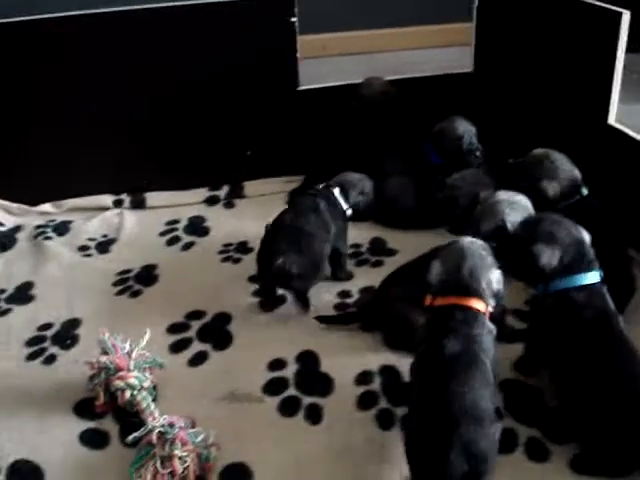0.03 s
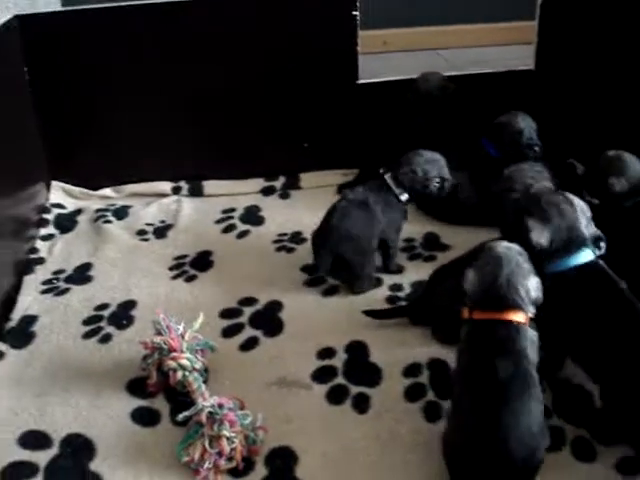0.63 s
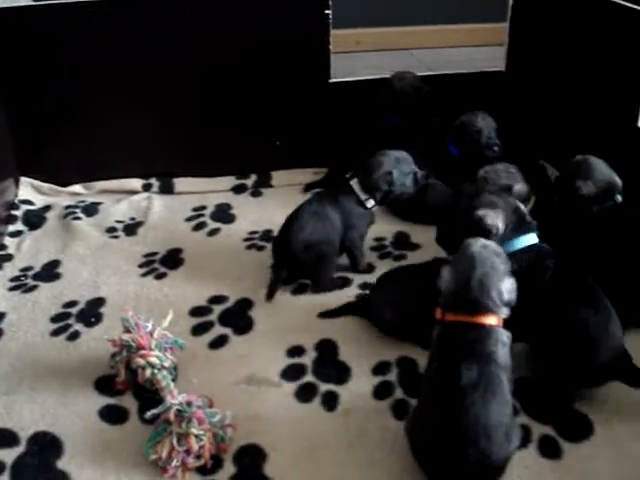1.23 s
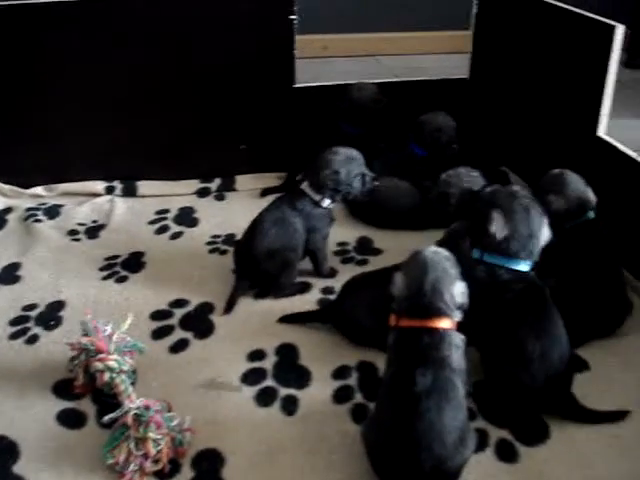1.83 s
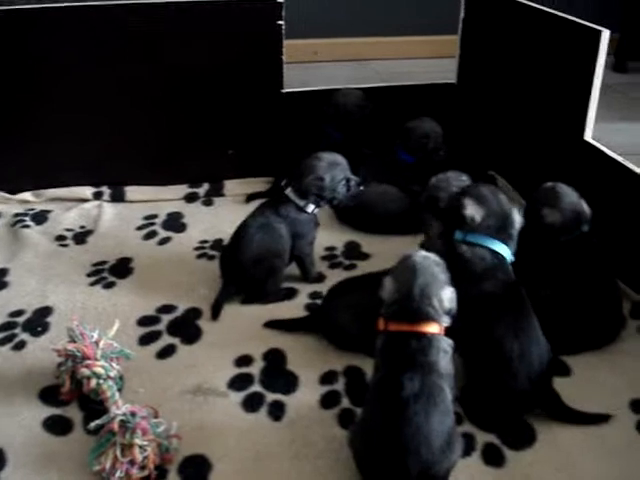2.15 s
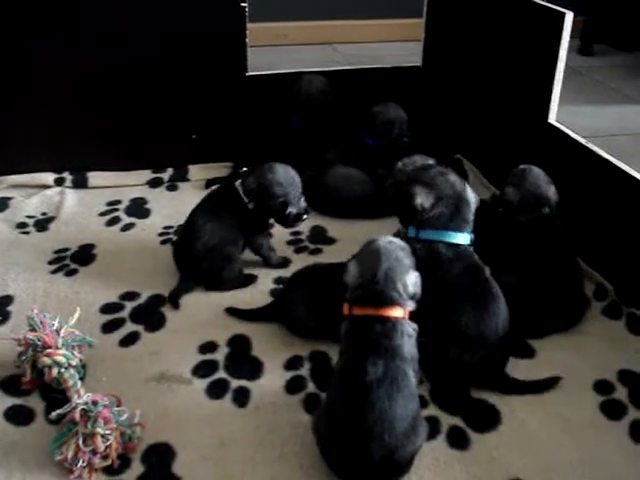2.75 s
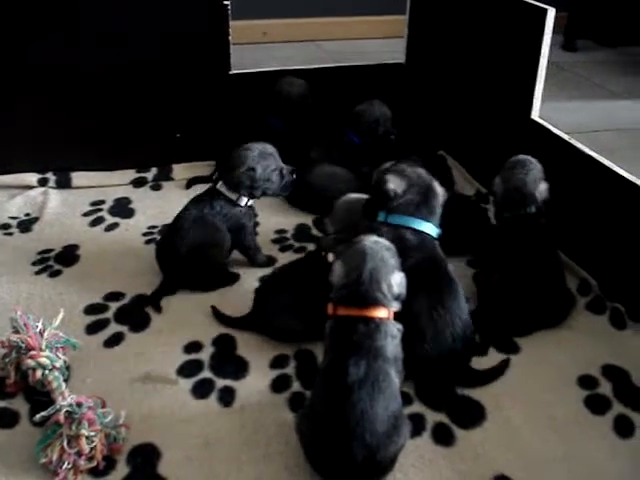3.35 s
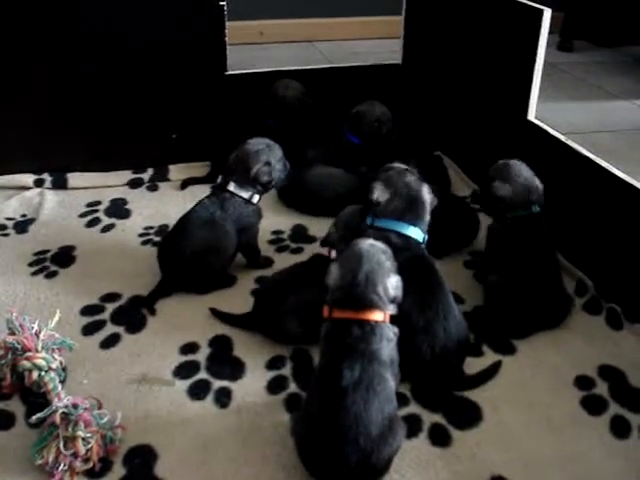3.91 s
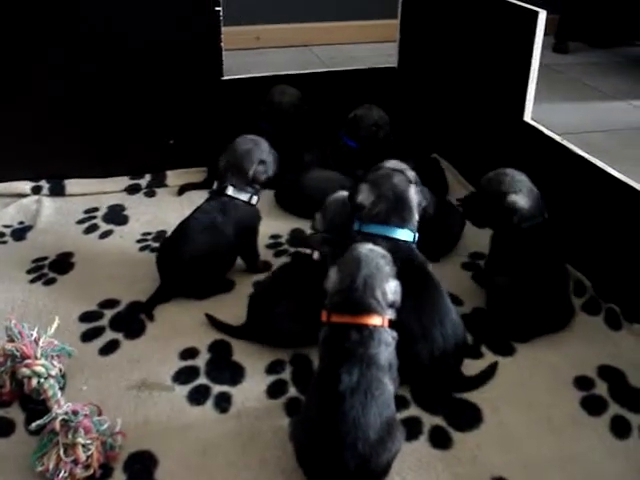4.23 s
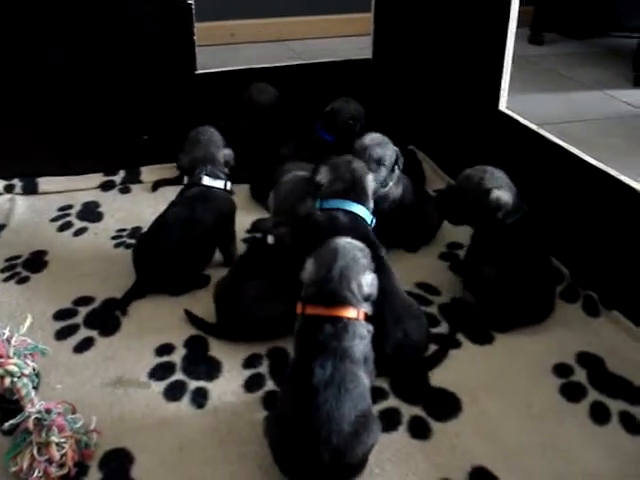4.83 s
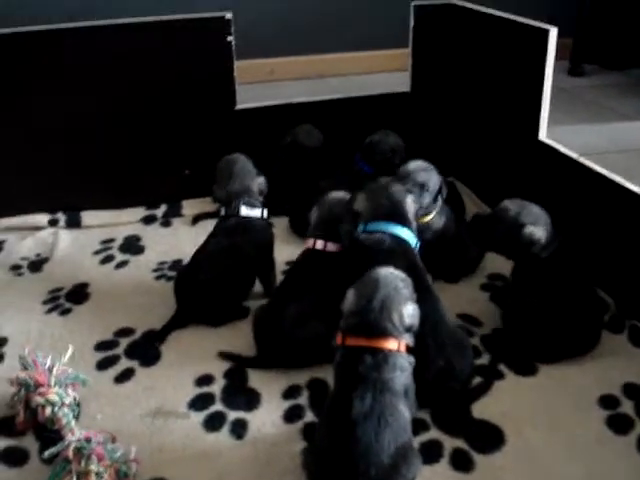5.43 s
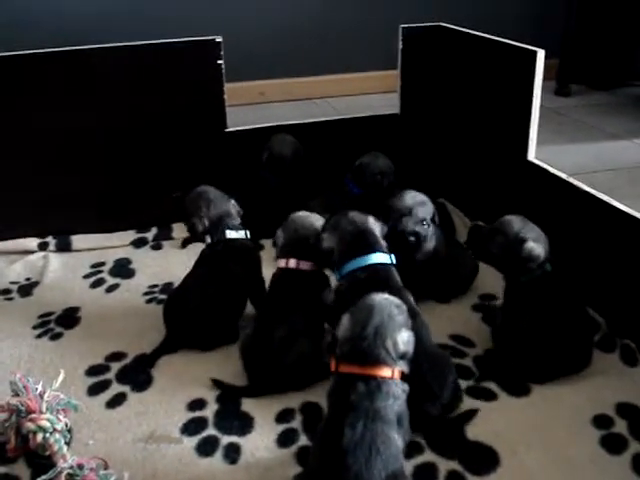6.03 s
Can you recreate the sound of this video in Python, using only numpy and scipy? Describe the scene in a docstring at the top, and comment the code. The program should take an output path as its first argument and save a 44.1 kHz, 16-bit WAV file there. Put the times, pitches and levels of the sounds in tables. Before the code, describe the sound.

Young puppies whine in a quiet room, a step or two from the microphone. The first and highest cry is already under way at the start, a sharp yelp sinking into a wavering nasal whine until about 0.7 seconds, with soft paw bumps near its end. Four more cries start at about 0.9, 1.8, 2.7 and 3.5 seconds. Each lasts roughly half a second, leaping up in a slightly cracking yelp, then dropping into a whine that slides up and down. The second and fifth whines are lower.

After 4.1 seconds it gets much quieter. A tiny low whimper follows the last cry, a higher one rises and falls at about 4.8 seconds with a faint sniff, and a last short one comes near 5.9 seconds. Fur brushes a blanket and paws bump very softly between them. A light hiss, faint handling rumble and brief room echo lie underneath.

```python
"""A quiet tiled room: puppies whine in a wooden pen, a step or two from the microphone.
Five cries start as an open-mouthed yelp and sink into a long whine through the nose; faint whimpers
follow. Each is a gliding stack of vocal-fold harmonics plus breath, shaped by throat, mouth and nose.
Paws bump, fur brushes on a blanket, a puppy sniffs faintly, and the room rings briefly. The hand on
the microphone rumbles; the recorder adds hiss and a thin high tone."""
import sys
import numpy as np
from scipy import signal
from scipy.fft import rfft, irfft, next_fast_len
from scipy.io import wavfile
from scipy.ndimage import uniform_filter1d

SR = 44100
rng = np.random.default_rng(int(sys.argv[2]) if len(sys.argv) > 2 else 0)


def store_wav(level_fs):
    """Save 16-bit WAV to argv[1]."""
    pcm = np.round(np.clip(np.atleast_2d(level_fs), -1, 1) * 32767)
    wavfile.write(sys.argv[1], SR, pcm.T.astype(np.int16))


N = 267898
BAND_LIMIT_HZ = 10050


def gain_of(db):
    """Decibels to amplitude."""
    return 10 ** (np.asarray(db) / 20)


def read(points, hz):
    """Interpolates a table on a log-frequency axis."""
    f, value = np.transpose(points)
    return np.interp(np.log(hz + 1), np.log(f + 1), value)


def ramp(t, start, length):
    """Linear rise from 0 to 1."""
    return np.clip((t - start) / length, 0, 1)


def bell(x, centre, width):
    """Gaussian of height 1."""
    return np.exp(-((x - centre) / width) ** 2)


def add(mix, start_s, sound):
    """Mixes a sound in; start_s may be negative."""
    start = round(start_s * SR)
    sound = sound[max(-start, 0):]
    part = mix[max(start, 0):][:len(sound)]
    part += sound[:len(part)]


def shaped_noise(gain_at, size):
    """Noise of rms 1, weighted by gain_at(hz)."""
    padded = 2 * next_fast_len(size // 2 + 1)
    hz = np.fft.rfftfreq(padded, 1 / SR)
    noise = irfft(rfft(rng.standard_normal(padded)) * gain_at(hz))[:size]
    return noise / np.sqrt(np.mean(noise ** 2) + 1e-20)


def coloured(spectrum, size):
    """Noise of rms 1 from (Hz, dB) points."""
    return shaped_noise(lambda hz: gain_of(read(spectrum, hz)), size)


def wander(rate_hz, size):
    """Smooth random motion of rms 1, up to about rate_hz."""
    return shaped_noise(lambda hz: 1 / (1 + (hz / rate_hz) ** 4), size)


# Each row: frequency in Hz, relative noise density in dB.
HISS_SPECTRUM = [(15, -64), (25, -25.5), (109, -9.5), (226, -1.5), (363, 0), (412, -1.5), (491, -1),
                 (599, -0.5), (679, -3), (732, -1), (1120, -4), (1850, -5.5), (9870, -13.5), (12800, -54),
                 (21700, -120)]


def background(hiss_db=-60.5, swell_db=0.93, tone_hz=8122.5, tone_db=-77.5):
    """Room noise and recorder hiss, with a thin electronic tone."""
    hiss = coloured(HISS_SPECTRUM, N) * gain_of(hiss_db + swell_db * wander(8.5, N))
    tone = np.sqrt(2) * np.sin(2 * np.pi * tone_hz * np.arange(N) / SR)
    return hiss + gain_of(tone_db) * tone


# Each row: time in seconds, rumble level in dB.
HANDLING_LEVELS = [(0, -70.5), (.9, -74), (1.402, -78), (1.998, -78), (3.7, -71), (4.4, -80), (6.07, -103)]


def handling(lumps_db=3):
    """Uneven low rumble from the hand holding the microphone."""
    level_db = np.interp(np.arange(N) / SR, *np.transpose(HANDLING_LEVELS))
    rumble = coloured([(15, -19), (35, -13), (100, -8.5), (190, -5), (450, -29)], N)
    return rumble * gain_of(level_db + lumps_db * wander(34, N))


# Each row: frequency in Hz, time for the room to decay 60 dB in seconds.
ROOM_T60 = [(250, 0.17), (800, 0.44), (2000, 0.59), (4500, 0.37), (9000, 0.32)]


def room(x, room_db, echoes=6):
    """Early echoes off the pen walls, then the room's diffuse tail."""
    t = np.arange(SR) / SR
    hz, frame_s, spectra = signal.stft(rng.standard_normal(SR), SR, nperseg=256)
    decay = gain_of(-60 * frame_s / read(ROOM_T60, hz)[:, None])
    tail = signal.istft(spectra * decay, SR, nperseg=256)[1][:SR] * ramp(t, 0.006, 0.012)
    response = tail / np.linalg.norm(tail)
    delays = (rng.uniform(0.003, 0.018, echoes) * SR).astype(int)
    response[delays] += gain_of(-8) * rng.choice([-1, 1], echoes) / np.sqrt(echoes)
    response *= gain_of(room_db)
    response[0] += 1  # direct sound
    return signal.fftconvolve(x, response / np.linalg.norm(response))


# Each row: frequency in Hz, relative noise level in dB.
SWELL_SPECTRUM = [(100, -10), (300, -6), (1200, -5.5), (2200, -4), (3500, -10.5), (6000, -8), (10000, -19)]
# Each row: start in seconds, length in seconds, level in dB.
HISSY_SWELLS = [(4.22, 0.06, -64), (4.827, 0.2, -61), (5.447, 0.035, -66)]


def fur_and_sniff(rise_s=0.023, fall_s=0.078, grain_db=2.0):
    """Soft hissy swells: fur brushing, and a puppy's faint sniff near 4.8-5.0 s."""
    t = np.arange(N) / SR
    swells = np.zeros(N)
    for start, length, level_db in HISSY_SWELLS:
        before, after = np.minimum(t - start, 0), np.maximum(t - start - length, 0)
        swells += gain_of(level_db) * np.exp(before / rise_s - after / fall_s)
    return coloured(SWELL_SPECTRUM, N) * swells * gain_of(grain_db * wander(40, N))


# Each row: start in seconds, level in dB, pitch in Hz, rough length in seconds.
PAW_BUMPS = [(.527, -53.5, 232, 0.037), (0.599, -68, 214, 0.026), (0.719, -68, 220, 0.025),
             (2.169, -74, 240, 0.027), (4.19, -74, 328, 0.074), (4.91, -66, 298, .05),
             (5.219, -74, 330, .04)]


def paw_bump(level_db, hz, length_s):
    """A padded blow of paw or body on the pen floor: a swell of low noise, no ring."""
    t = np.arange(SR // 3) / SR
    spectrum = [(hz / 5, -28), (hz * 0.6, -12), (hz, 0), (hz * 1.7, -18), (hz * 10, -42)]
    peak_s = length_s / 2
    envelope = t / peak_s * np.exp(1 - t / peak_s)
    return gain_of(level_db) * coloured(spectrum, len(t)) * envelope


# Throat response, mouth shut and wide open. Each row: frequency in Hz, gain in dB.
MOUTH_SHUT = [(280, -12), (400, -11), (580, 3.5), (780, 0), (1100, -0.5), (1500, 1.5), (2050, -11.5),
              (2500, -29), (3300, -29), (4700, -28.5), (5700, -28), (7000, -28), (10000, -52.5)]
MOUTH_OPEN = [(330, -20.5), (600, 3.5), (900, 0.5), (1250, -6), (1700, -1.5), (2250, -0.5), (3000, 1),
              (3700, -13), (4400, -10.5), (5400, -10.5), (6500, -6.5), (7400, -10.5), (8500, -22),
              (10000, -29.5)]


def throat_db(hz, nasal_db, mouth, nose_hz=1700, nose_width_hz=800):
    """An open mouth lets the treble out; the nose adds a flat-topped resonance."""
    oral_db = (1 - mouth) * read(MOUTH_SHUT, hz) + mouth * read(MOUTH_OPEN, hz)
    return oral_db + nasal_db * np.exp(-((hz - nose_hz) / nose_width_hz) ** 4)


# Each row: frequency in Hz, relative level of the nose hiss in dB.
NOSE_SPECTRUM = [(300, -32), (800, 0), (1700, -1.5), (2500, -16.5), (3400, -3), (4700, -9), (5800, -4.5),
                 (6800, -5), (8500, -13), (10000, -23)]


def breath(cycles, mouth, rasp_db, hiss_db):
    """Air leaves by mouth and nose, one puff per vocal-fold cycle."""
    rasp = gain_of(rasp_db) * mouth * coloured(MOUTH_OPEN, len(cycles))
    hiss = gain_of(hiss_db) * coloured(NOSE_SPECTRUM, len(cycles))
    return (rasp + hiss) * (1 + np.cos(2 * np.pi * cycles))


# Five cries, then three whimpers. Each row: throat whistle in Hz; whistle, shut-mouth fundamental,
# treble, rasp and nose hiss gains in dB; pitch jitter as a share; room gain in dB.
CALL_VOICES = [ (3940, 22, -0.5, -1.5, -28, -20.5, 0.0095, -5),
               (4830, 22, -2, -13, -17, -19.5, 0.0089, -5.5), (4650, 15, -2, -5, -15, -18.5, 0.0064, -7),
               (4300, 13, 5, 3, -32, -30, .001, -6), (4430, 20, -1, -3, -20.5, -26, .006, -6.5),
               (4500, 0, 8, 0, -12, -20, .02, -6), (4500, 0, 3, -3, -20, -21, .016, -6),
               (4500, 0, 10.5, -3, -5, -14, 0.033, -4), ]


def puppy_voice(contour, voice, tremble=0.0063, waver_db=1.9,
                crack_oct_per_s=22, crack_jitter=0.04, crack_db=2.5, crack_split=0.4):
    """Vocal-fold harmonics and breath follow a contour, through the throat and into the room."""
    whistle_hz, whistle_db, fundamental_db, treble_db, rasp_db, hiss_db, jitter, room_db = voice
    times, *tracks = contour
    t = np.arange(times[0], times[-1], 1 / SR)
    n = len(t)
    tracks = [np.interp(t, times, track) for track in tracks]
    hz, level_db, nasal_db, mouth = uniform_filter1d(tracks, size=200, mode="nearest")
    mouth = np.clip(mouth, 0, 1)
    # the folds lose their grip in fast slides: the voice cracks
    oct_per_s = uniform_filter1d(abs(np.gradient(np.log2(hz))) * SR, size=500)
    crack = np.tanh(oct_per_s / crack_oct_per_s) * np.sqrt(mouth)
    hz = hz * (1 + tremble * wander(51, n) + (jitter + crack_jitter * crack) * wander(202, n))
    level_db = level_db + crack_db * crack * wander(270, n)
    cycles = np.cumsum(hz) / SR
    k = np.arange(1, 19)[:, None]
    harmonic_hz = k * hz
    colour_db = throat_db(harmonic_hz, nasal_db, mouth) + fundamental_db * (1 - mouth) * (k == 1)
    colour_db += whistle_db * mouth * bell(harmonic_hz, whistle_hz, 300)
    colour_db += treble_db * ramp(harmonic_hz, 2800, 1000)
    gains = gain_of(colour_db) * (harmonic_hz < BAND_LIMIT_HZ)
    gains /= np.sqrt((gains ** 2).sum(0) / 2)
    offsets = rng.random(k.shape)  # the throat delays each harmonic differently
    sound = (gains * np.cos(2 * np.pi * (k * cycles + offsets))).sum(0)
    sound *= 1 + crack_split * crack * np.cos(np.pi * cycles)  # strong and weak pulses alternate
    sound += breath(cycles, mouth, rasp_db, hiss_db)
    fade = ramp(np.minimum(t - t[0], t[-1] - t), 0, 0.003)
    level_db += waver_db * (1 - mouth) * wander(47, n)  # whines are less steady than yelps
    return room(sound * fade * gain_of(level_db), room_db)


# Each row: time in seconds, level change in dB.
VOICE_CATCHES = [(0.183, -14), (0.3, -11), (1.096, -33), (1.19, 1), (1.304, -17), (2.103, -16),
                 (2.305, -12.5), (3.067, 1), (3.213, -11), (3.845, -3), (3.952, -23), (4.013, -27),
                 (4.86, -7), (4.888, -11)]


def catches_db(t, half_length_s=0.0073):
    """Brief dips where the voice catches."""
    return sum(dip_db * bell(t, at_s, half_length_s) for at_s, dip_db in VOICE_CATCHES)


# Each row: time and half length in seconds, level and nasal changes in dB, extra mouth opening.
WHINE_PUSHES = [(0.16, 0.039, -2.5, -19, 0.005), (0.264, 0.0079, 6, 1, 0), (0.353, 0.021, 5, 0, 0.055),
                (0.413, 0.036, 4.5, -13.5, 0), (0.581, 0.018, 8.5, -25, 0), (1.15, 0.021, 3, 4.5, 0),
                (2.085, 0.0099, 4, 6.5, 0.018), (2.209, 0.013, 2.5, 14, 0), (2.878, 0.02, 3.5, -5, 0.028),
                (3.042, 0.01, 4.5, 6, 0.041), (3.106, 0.011, 2, 23, 0), (3.17, 0.063, 4, -4, 0)]


def pushes(t):
    """The puppy pushes harder in mid-whine, shifting level, nasal ring and mouth opening."""
    return sum(np.outer(changes, bell(t, at_s, half_s)) for at_s, half_s, *changes in WHINE_PUSHES)


# Each row: start and length in seconds, top pitch in Hz, pitch arch as a share, top level in dB,
# nasal ring in dB.
WHIMPER_ARCHES = [(4.111, 0.072, 354.4, 0.03, -64, -23), (4.767, 0.172, 897, 0.25, -49, -3),
                  (5.862, 0.058, 305, 0.055, -55, -8.5)]


def whimper(start, length, top_hz, arch_share, top_db, nasal_db, arch_db=19.5, mouth=0.083):
    """Contour of a whimper, mouth nearly shut: pitch and level rise and fall together."""
    t = np.arange(start, start + length, 1 / SR)
    sag = 1 - np.sin(np.pi * ramp(t, start, length))
    hz = top_hz * (1 - arch_share * sag)
    level_db = top_db - arch_db * sag ** 2 + catches_db(t)
    return np.broadcast_arrays(t, hz, level_db, nasal_db, mouth)


# Each row: start, leap and break in seconds; pitch at each in Hz; start and top level in dB;
# widest mouth 0-1; nasal ring in dB; quaver as a share; sink time in seconds.
CRY_YELPS = [(-0.14, -0.11, -0.002, 850, 1290, 1075, -40, -33.5, 0.75, 16, 0.005, 0.11),
             (0.908, 0.951, 0.978, 525, 805, 810, -40, -36.5, 0.95, 6, 0.015, 0.04),
             (1.763, 1.838, 1.852, 560, 815, 785, -39, -42, 0.9, 2, 0.025, 0.037),
             (2.654, 2.685, 2.722, 645, 1072, 1060, -40, -34, 1.0, 7, 0.002, 0.033),
             (3.508, 3.543, 3.584, 570, 880, 1000, -41, -35, 0.88, 7, 0.05, 0.031)]
# Each row: level in dB, slope in dB per second, nasal ring in dB, mouth opening 0-1,
# release in seconds, closing pitch drop as a share.
CRY_WHINES = [(-40.5, -14.5, 7.5, 0.06, 0.11, 0.13), (-47, -10, -4.5, 0.2, 0.078, 0.24),
              (-49, 5.5, -5, 0.05, 0.0047, 0.35), (-47.5, -0.5, -0.5, 0.12, 0.0047, 0.3),
              (-50.5, -3, -12.5, 0.08, 0.0062, 0.324)]
# One list per whine. Each row: time in seconds, pitch in Hz.
WHINE_TUNES = [
    [(0.032, 1175), (0.048, 1015), (0.066, 1000), (0.078, 860), (0.165, 885), (0.2, 835), (0.215, 720),
     (0.26, 630), (0.355, 766), (0.44, 575), (0.465, 738), (0.52, 765), (0.585, 900), (0.66, 820)],
    [(1.0, 522), (1.02, 385), (1.056, 311), (1.118, 470), (1.17, 484), (1.21, 392), (1.3, 392),
     (1.335, 468), (1.41, 425)],
    [(1.878, 447), (1.906, 385), (1.946, 775), (1.98, 826), (2.085, 750), (2.13, 803), (2.205, 817),
     (2.238, 686), (2.32, 785), (2.392, 715)],
    [(2.733, 637), (2.765, 546), (2.8, 385), (2.875, 597), (2.914, 461), (3.038, 542), (3.068, 750),
     (3.11, 780), (3.15, 736), (3.232, 725)],
    [(3.598, 600), (3.614, 370), (3.657, 280), (3.766, 468), (3.825, 382), (3.889, 407), (3.991, 376),
     (4.036, 394), (4.112, 368)],
]


def cry(yelp, whine, tune, climb_ratio=1.2, leap_s=0.011, quaver_hz=55, drop_s=0.0213,
        open_s=0.02, close_lag=1.17, attack_s=0.01, attack_db=-17, release_db=-22,
        slip_s=0.007, slip_db=-5, nasal_db_per_oct=5.5, nasal_waver_db=3.5):
    """Contour of a cry: a yelp climbs, leaps to a high note, breaks and sinks into a nasal whine."""
    start, leap, crest, start_hz, leap_hz, break_hz = yelp[:6]
    start_db, top_db, widest, yelp_nasal_db, quaver, sink_s = yelp[6:]
    whine_db, slope_db_per_s, whine_nasal_db, whine_mouth, release_s, drop = whine
    tune_s, tune_hz = np.transpose(tune)
    end = tune_s[-1]
    t = np.arange(start, end, 1 / SR)
    swell = ramp(t, start, leap - start)
    # after the break the effort sinks and the mouth closes
    since_break = np.maximum(t - crest, 0)
    effort = np.exp(-since_break / sink_s)
    gape = bell(since_break, 0, close_lag * sink_s)
    yelp_mouth = widest * ramp(t, start, open_s) * (0.96 + 0.04 * swell)
    mouth = gape * yelp_mouth + (1 - gape) * whine_mouth

    hz = np.interp(t, [start, leap - leap_s, leap, crest, *tune_s],
                   [start_hz, start_hz * climb_ratio, leap_hz, break_hz, *tune_hz])
    octaves = np.log2(hz / np.median(hz))
    hz *= 1 + quaver * gape * wander(quaver_hz, len(t))
    hz *= 1 - drop * ramp(t, end - drop_s, drop_s)

    yelp_db = start_db + (top_db - start_db) * swell
    held_db = whine_db + slope_db_per_s * since_break
    level_db = effort * yelp_db + (1 - effort) * held_db + catches_db(t)
    level_db += attack_db * (1 - ramp(t, start, attack_s))
    level_db += release_db * ramp(t, end - release_s, release_s)
    # the voice thins as it slips into and out of the high note
    level_db += slip_db * (bell(t, leap - leap_s / 2, slip_s) + bell(t, crest + leap_s / 2, slip_s))

    ring_db = whine_nasal_db + nasal_db_per_oct * octaves + nasal_waver_db * wander(18, len(t))
    nasal_db = effort * yelp_nasal_db * swell + (1 - effort) * ring_db
    push_db, push_nasal_db, push_mouth = pushes(t)
    return t, hz, level_db + push_db, nasal_db + push_nasal_db, mouth + push_mouth


def scene():
    """Shuffling, a sniff, cries and whimpers over the background, in mono."""
    pen = fur_and_sniff()
    for start_s, *bump in PAW_BUMPS:
        add(pen, start_s, paw_bump(*bump))
    mix = room(pen, room_db=-16)[:N] + background() + handling()
    contours = [cry(*parts) for parts in zip(CRY_YELPS, CRY_WHINES, WHINE_TUNES)]
    contours += [whimper(*row) for row in WHIMPER_ARCHES]
    for contour, voice in zip(contours, CALL_VOICES):
        times = contour[0]
        add(mix, times[0], puppy_voice(contour, voice))
    return mix[None]


def record(dry):
    """The recorder's steep band limit, after a 100-sample fade-in."""
    lowpass = signal.firwin(801, BAND_LIMIT_HZ, window=("kaiser", 8), fs=SR)
    fade_in = ramp(np.arange(N), 0, 100)
    return signal.oaconvolve(dry * fade_in, lowpass[None], "same")


dry = scene()
out = record(dry)
store_wav(out)
```